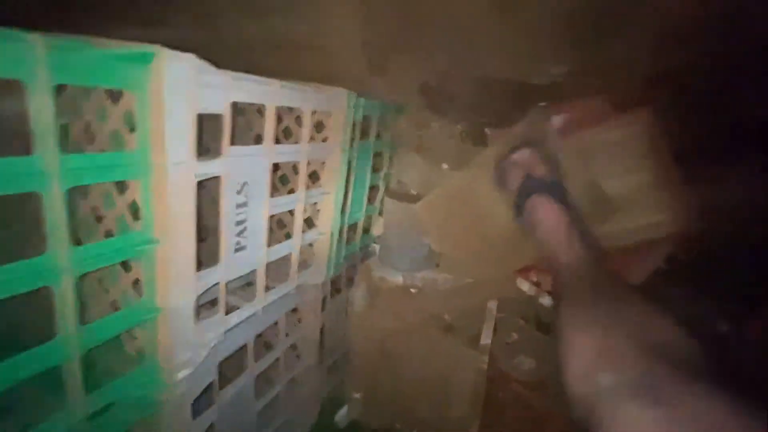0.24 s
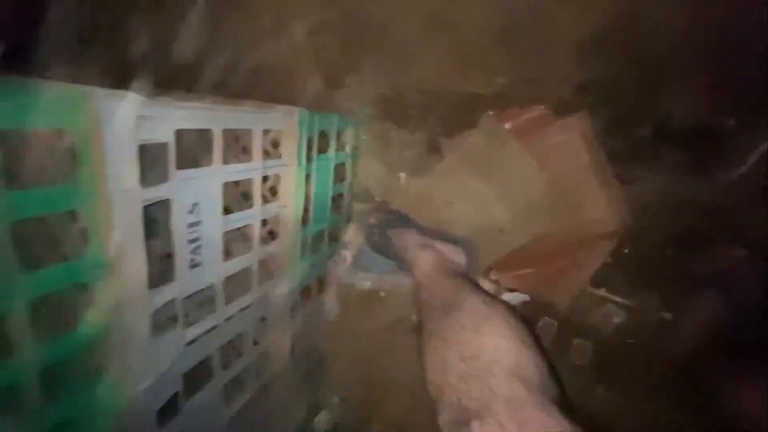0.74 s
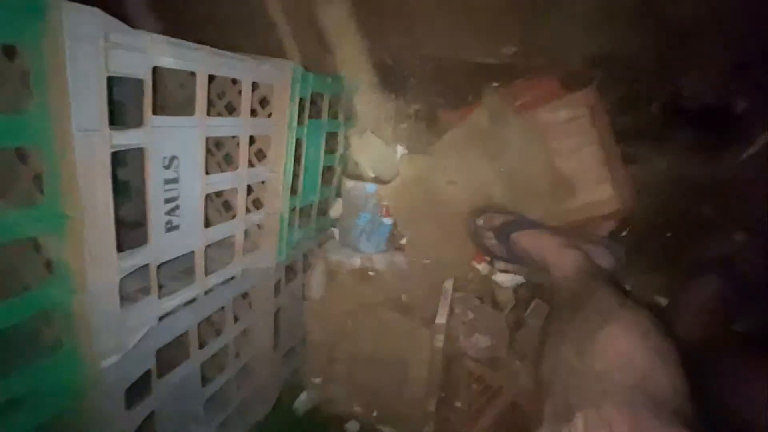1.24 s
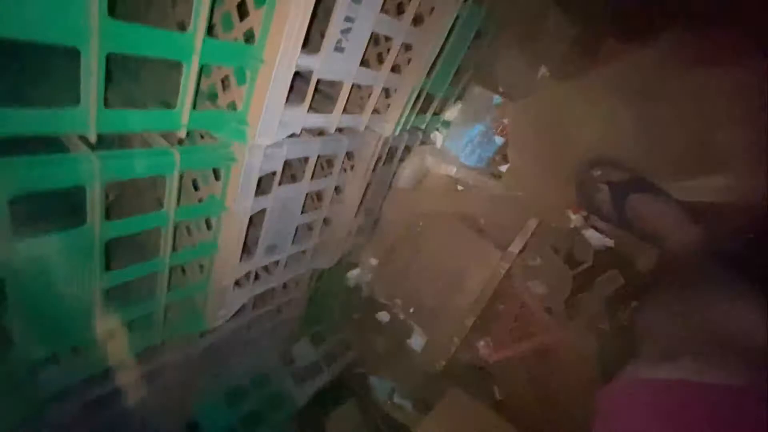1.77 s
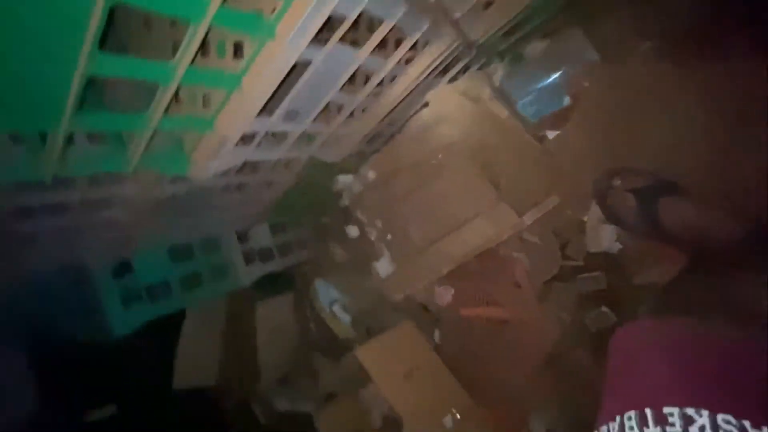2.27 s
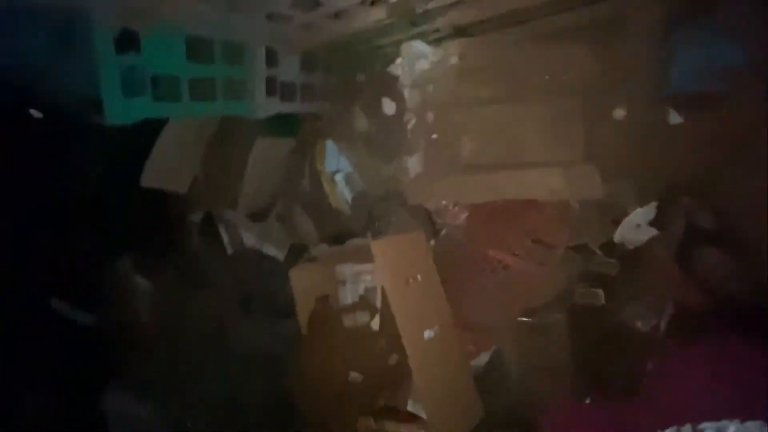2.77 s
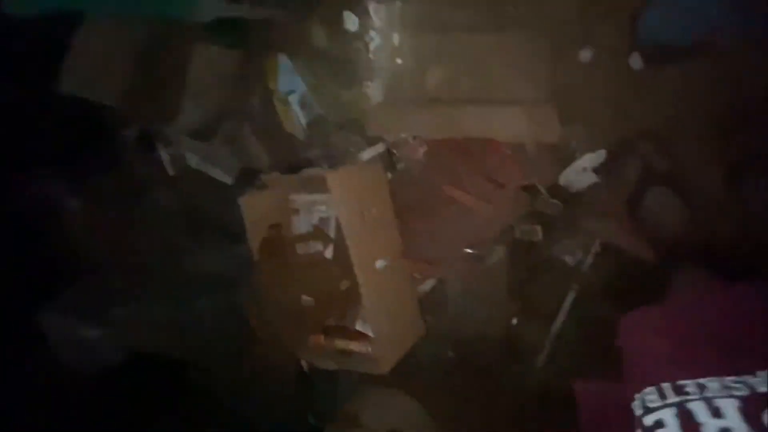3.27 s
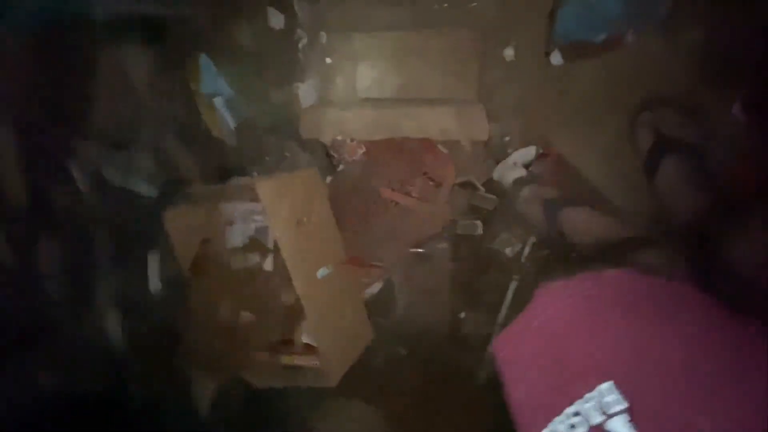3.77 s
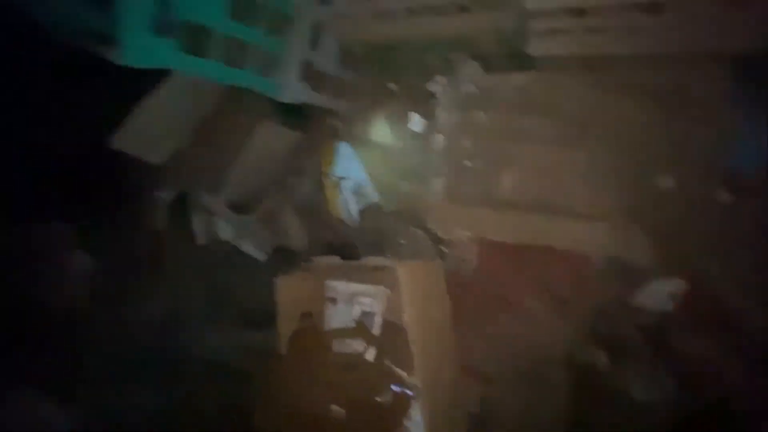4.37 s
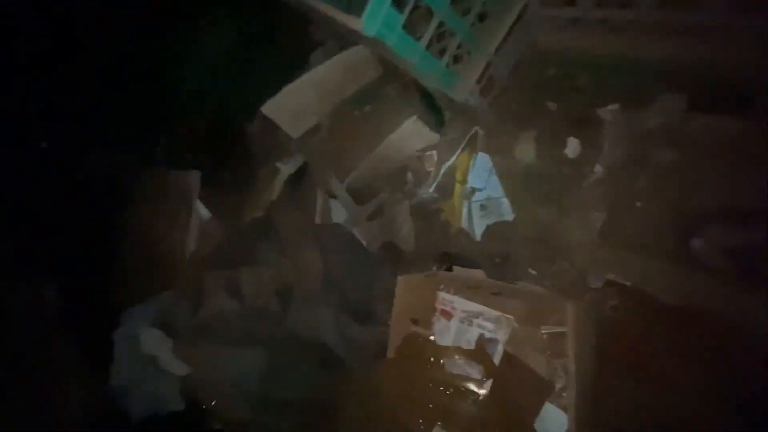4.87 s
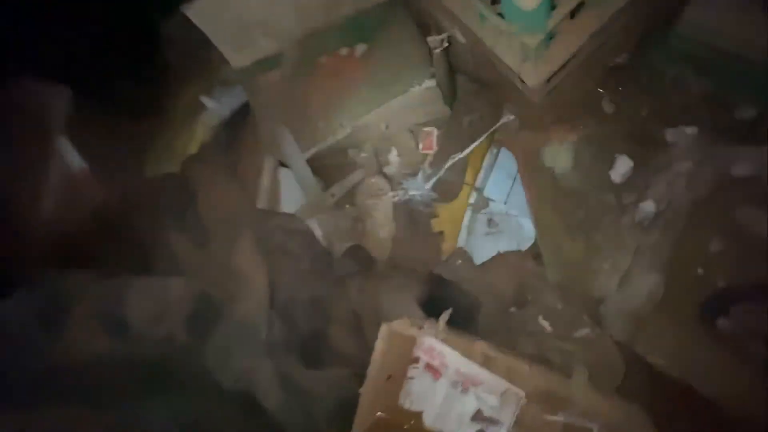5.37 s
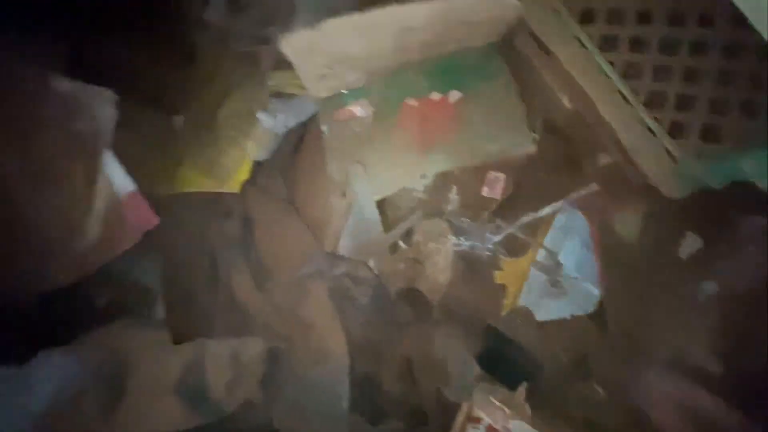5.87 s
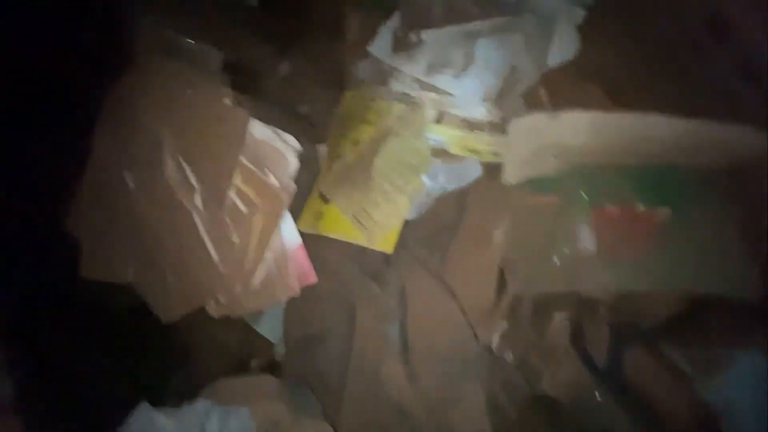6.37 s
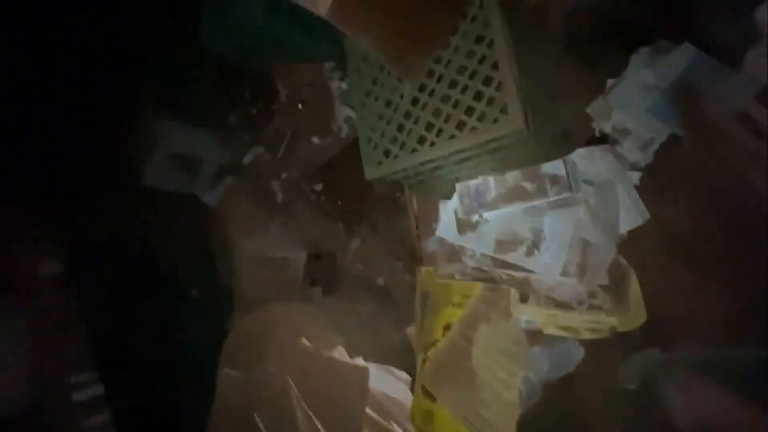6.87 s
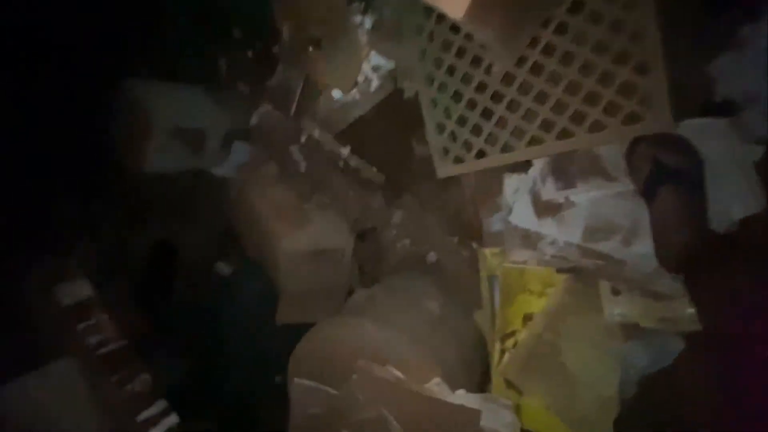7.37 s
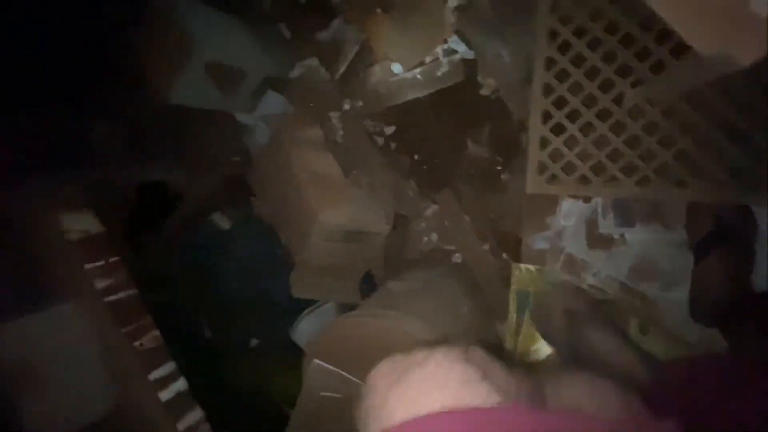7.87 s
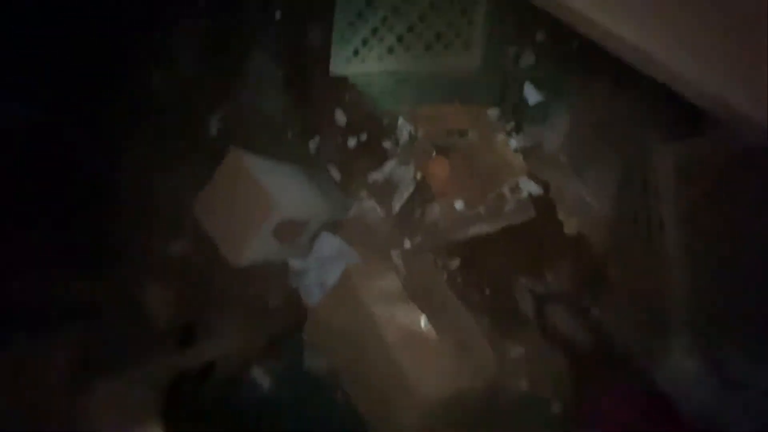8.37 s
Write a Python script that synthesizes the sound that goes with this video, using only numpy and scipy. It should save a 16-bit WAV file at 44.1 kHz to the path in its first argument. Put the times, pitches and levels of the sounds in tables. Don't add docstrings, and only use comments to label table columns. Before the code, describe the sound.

Close phone pickup in a cluttered little shed. Feet scuff grit and knock boxes aside, pause, then shove harder until a sharp hollow slam; rummaging follows, with brittle snaps, papery rasps, dull booming walls and brief squeaky rubs. Separate heavier bumps land near six and seven seconds, then an empty box slides softly and a last knock and scuffle finish it.

```python
import sys
import numpy as np
from scipy import signal
from scipy.fft import rfft, irfft, next_fast_len
from scipy.io import wavfile
from scipy.ndimage import uniform_filter1d, map_coordinates

SR = 44100
rng = np.random.default_rng(int(sys.argv[2]) if len(sys.argv) > 2 else 0)


def volts(x):
    e = np.asarray(x, float) / 20
    return 10 ** e


def digitize_waveform(pressure):
    field = np.atleast_2d(pressure).T
    bounded = np.clip(field, -1, 1)
    quanta = np.round(bounded * 32767).astype(np.int16)
    wavfile.write(sys.argv[1], SR, quanta)


N = 380583

# (frequency [Hz], density [dB per Hz])
GRIT_HISS = [(900, -30.5), (2200, -5.5), (4500, -7), (7000, -8.5), (10000, -11.5), (12500, -18),
             (15000, -14.5), (16300, -24)]
BEND = 1.105


def unit(x):
    return x / np.sqrt(np.mean(x ** 2) + 1e-20)


def along(points, hz):
    f, v = np.transpose(points)
    return np.interp(np.log(hz + 1), np.log(f + 1), v)


def wobble(rate):
    knots = rng.standard_normal(int(N * rate / SR) + 4)
    return map_coordinates(knots, [np.arange(N) * rate / SR])


def filtered(x, response):
    m = next_fast_len(x.shape[-1] + 8192)
    return irfft(rfft(x, m) * response(np.fft.rfftfreq(m, 1 / SR)), m)[..., :x.shape[-1]]


def spread(pair):
    # (frequency [Hz], likeness [0-1])
    port_likeness = [(60, 0.97), (300, 0.92), (700, 0.36), (1400, 0.81), (3000, 0.18), (7000, 0.63),
                     (11000, 0.59), (15000, 0.74)]

    def mix(hz):
        turn = np.arccos(np.clip(along(port_likeness, hz), -1, 1)) / 2
        return np.array([np.cos(turn), np.sin(turn)])

    common, apart = filtered(pair, mix)
    return np.array([common + apart, common - apart])


def rasp(spectrum, pressure):
    return unit(filtered(pressure, lambda hz: volts(along(spectrum, hz))))


def catching(grains_hz, grain_s, spike_db):
    size = np.minimum(rng.exponential(size=N), 2.5)
    catch = (rng.random(N) < grains_hz / SR) * volts(spike_db * size)
    onset = np.minimum(np.arange(400) / 60 + .2, 1)
    kernel = signal.windows.exponential(400, 60, grain_s * SR, False) * onset
    return unit(signal.fftconvolve(catch, kernel)[:N])


def clumped(clump_db):
    z = signal.stft(rng.standard_normal((2, N)), nperseg=256)[2]
    field = uniform_filter1d(rng.standard_normal(z.shape[1:]), size=2, axis=0)
    field = uniform_filter1d(field, size=12, axis=1)
    return signal.istft(z * volts(clump_db * unit(field)), nperseg=256)[1][:, :N]


def swells(peak_s, rise_s, fall_s, peak_db, under_db):
    # (time [s], level [dB])
    settling = [(0, -61), (.28, -68.5), (.45, -65), (.96, -69.5), (1.5, -90), (1.72, -88), (2.36, -71),
                (3.74, -86), (3.86, -66), (4.5, -78), (4.73, -92), (4.8, -96), (5.25, -74), (5.69, -70),
                (6.05, -64.5), (6.81, -64), (7.05, -67.5), (7.7, -71.5), (8, -72.5), (8.63, -72.5)]
    t = np.arange(0, N / SR + .004, .002)
    late = t - np.reshape(peak_s, (-1, 1))
    span = np.where(late < 0, np.reshape(rise_s, (-1, 1)), np.reshape(fall_s, (-1, 1)))
    below_db = 20 * (np.abs(late) / np.maximum(span, .004)) ** BEND
    each = volts(np.reshape(peak_db, (-1, 1)) - below_db)
    rest = volts(np.interp(t, *np.transpose(settling)) + under_db)
    return np.interp(np.arange(N) / SR, t, np.sqrt((each ** 2).sum(axis=0) + rest ** 2))


def shoving():
    # (peak [s], rise [s per 20 dB], fall [s per 20 dB],
    # strength [dB], load on the hollow boxes [dB])
    shoves = [(0.159, 0.08, 0.06, -52, -7), (.47, -0.09, 0.14, -51, -2), (0.555, .04, 0.1269, -39.5, 6),
              (0.588, 0.01, 0.0958, -42.5, 18.5), (.71, -0.0248, 0.08, -49, 7.5),
              (0.798, 0.02, 0.0474, -45.5, 5.5), (1.0, 0.03, 0.2, -49, 4), (1.08, -0.06, 0, -53, 11.5),
              (1.78, 0.04, 0.17, -52, -3.5), (1.878, 0.1341, 0.75, -58, 1), (2.11, 0.2631, 0.35, -54, 5.5),
              (2.466, 0.0245, 0.28, -38, -4), (2.568, 0.0951, 0.11, -42.5, 5.5),
              (2.748, 0.06, 0.08, -49, -3.5), (2.955, 0.09, 0.0436, -41, 0.5),
              (3.125, 0.0053, 0.0148, -36, -3.5), (3.18, 0.27, 0.1, -47.5, 11),
              (3.371, 0.92, -0.2, -60.5, 4.5), (3.46, 0.36, 0.17, -56.5, 5), (3.59, 0.64, -0.05, -56, 6.5),
              (3.811, 0.04, .02, -64, 10.5), (3.96, .05, 0.17, -46.5, -4.5), (4.05, 0, 0.19, -48, 1),
            (4.141, 0.25, -0.03, -47.5, -10), (4.269, 0.1, 0.24, -52.5, 3.5), (4.37, 0.13, 0.24, -53, 7.5),
            (4.459, 0.16, -0.0037, -45.5, -3), (4.508, 0.12, 0.11, -46.5, 9.5),
            (4.815, .02, 0.2, -51.5, -24), (4.93, 0.05, 0.19, -47.5, -16.5), (5.04, 0.18, 0.18, -60, 10),
            (5.39, 0.07, 0.11, -56, 6.5), (5.446, 0.07, .14, -48.5, -3), (6.119, 0.0576, 0.2664, -39, 4),
            (6.501, 0.25, 0.06, -53, -6), (6.66, 0.7, 0.55, -60.5, 8.5), (7.13, 0.055, 0.2, -40, 3),
            (7.21, -0.02, 0.17, -50, 6.5), (7.375, 0.18, 0.12, -52, 8), (7.56, .2, 0.12, -64, 8),
            (8.142, 0.04, 0.7, -59, 5), (8.4, 0.09, 0.14, -56.5, 5), (8.448, 0.06, 0.14, -56, 7)]
    # (peak [s], rise, fall [s per 20 dB], strength, load [dB])
    scuffs = [(0.63, 0.01, 0.0463, -46.5, 12), (3.03, 0.0751, 0.06, -46.5, 0.5), (3.14, 0.05, .09, -39, -5),
              (3.09, .04, .02, -42, 0), (3.3, 0.05, 0.01, -50.5, -0.5), (2.42, 0.03, 0.15, -49, 0.5),
              (1.03, 0.01, 0.0651, -51, 4.5), (.88, .08, 0.08, -65, -4.5), (4.435, 0.05, 0.03, -50, -3),
              (4.57, 0, 0.12, -56.5, 14), (3.22, 0.17, -0.12, -54.5, -1), (3.64, 0.93, 0.08, -66.5, 1),
              (3.934, .02, .012, -39, -12), (4.2, 0.02, -0.05, -53, -5), (5.795, .02, 0.01, -64, -28),
              (.8, .025, 0.0242, -42, -20), (4.52, 0.4, 0.33, -66, 16), (5.305, -0.12, 0.26, -62, -12),
              (5.46, -0.02, 0.01, -47, -5), (6.089, 0.01, 0.002, -34, 3),
              (6.127, 0.0063, -0.0042, -37.5, 1), (6.16, 0.0075, -0.0038, -35, -1),
              (6.251, 0.0429, 0.0047, -44, 5.5), (6.395, 0.04, -0.05, -50, -8),
              (6.67, 0.05, -0.01, -47.5, -4.5), (8.3, .05, .1, -57.5, 0), (8.36, .04, 0.1, -56, 12.5)]
    # (peak [s], fall [s per 20 dB], strength [dB])
    treads = [(.18, 0.13, -49), (.59, 0.15, -47), (.83, 0.1, -53), (1.04, 0.08, -46), (2.2, 0, -49.5),
              (2.57, .5, -58), (2.94, .04, -42), (3.14, 0.06, -34.5), (3.3, 0.4, -45.5), (3.6, 0.06, -50),
              (4.03, 0.44, -57.5), (4.53, 0.2, -49), (5.05, 0.12, -47.5), (5.4, 0.38, -54),
              (6.18, 0.32, -43.5), (6.53, 0.14, -38), (6.749, 0.5, -67), (7.128, 0.31, -39.5),
              (7.38, -0.4, -32.5), (7.72, 0.2, -60), (8.16, 0.1, -51), (8.48, 0.37, -47)]
    # (time [s], level [dB])
    drag = [
        (7.4, -96),
        (7.62, -60),
        (7.8, -64),
        (8.02, -56),
        (8.11, -58),
        (8.2, -103),
    ]
    # (frequency [Hz], density [dB per Hz])
    card_rasp = [(250, -18), (550, -1.5), (1000, -5), (1600, -8.5), (2300, -8.5), (4500, -25.5)]
    hollow_hum = [(110, -34), (190, 2), (320, 5), (480, 3.5), (800, -54.5)]
    ground_thud = [(20, -14), (40, -2), (70, 7), (100, 1.5), (160, -1.5), (260, -50.5)]
    box_hum = [(180, -14), (310, 4), (400, 2.5), (500, -1.5), (900, -30)]

    t = np.arange(N) / SR
    s, rise, fall, db, load = np.transpose(shoves + scuffs)
    land, ease, weight_db = np.transpose(treads)
    low = rng.standard_normal((2, N))
    judder = wobble(40)
    grains = catching(grains_hz=150, grain_s=.003, spike_db=2.5)

    press = volts(1.9 * judder) * (1 + 0.1 * grains) * clumped(clump_db=3.0)
    grit = volts(2.5) * swells(s, rise, fall, db, 0) * rasp(GRIT_HISS, press)

    press = volts(2.6 * judder + 1.4 * wobble(58)) * (1 + .5 * grains) * clumped(clump_db=4.0)
    card_db = db + 1.2 + 0.15 * load
    card = volts(2.5) * swells(s, rise, 0.86 * fall, card_db, -12) * rasp(card_rasp, press)

    press = volts(.9 * judder + 2 * wobble(25)) * low
    hollow = volts(-4) * swells(s, rise, 0.94 * fall, db + load, -7.5) * rasp(hollow_hum, press)

    weight = volts(-2.0) * swells(land, 0.41 * ease, ease, weight_db, -31.5)
    ground = (weight + volts(-79)) * rasp(ground_thud, low)

    box = volts(np.interp(t, *np.transpose(drag))) * rasp(box_hum, low[::-1, ::-1])
    return spread(grit + card + hollow + ground + box)


def knocks():
    # (time [s], peak [dB], ring [Hz])
    cracks = [(.53, -42, 2320), (.783, -51.5, 1200), (2.659, -44.5, 2250), (3.931, -45.5, 2435),
              (6.516, -41.5, 2500), (6.651, -41, 746), (7.492, -56, 1500)]
    snaps = [(.7, -38, 732), (1.39, -50.5, 3750), (1.997, -38.5, 1400), (3.401, -43.5, 1050),
             (4.077, -38.5, 1100), (4.127, -32.5, 2800), (4.17, -43, 2360), (4.514, -35, 5200),
             (5.792, -47, 2700), (6.186, -21, 4200), (6.26, -36, 3930), (7.19, -34.5, 750)]
    # (time [s], peak [dB], ring [Hz])
    ticks = [(0.635, -30.5, 1300), (0.708, -35, 2550), (1.852, -38, 2980), (2.604, -30, 1190),
             (3.128, -16.5, 1314), (3.468, -37.5, 2330), (3.617, -49, 2270), (4.14, -40, 2420),
             (4.189, -42, 805), (4.547, -37, 802), (4.611, -52, 845), (4.671, -55.5, 2100),
             (4.983, -36, 1880), (5.041, -38.5, 2230), (5.074, -39, 810), (5.174, -62, 810),
             (5.426, -34, 2310), (5.499, -44, 2040), (6.209, -28.5, 1030), (6.246, -31, 500),
             (6.307, -36.5, 1780), (6.329, -41, 1290), (6.352, -37.5, 2800), (6.399, -44, 3500),
             (6.563, -42, 2080), (6.619, -45, 2760), (8.192, -42.5, 1580), (8.277, -39, 820),
             (8.309, -44, 2400), (8.341, -45.5, 1500), (8.393, -37.5, 3110), (8.428, -38, 2200)]
    # (time [s], peak [dB], ring [Hz], t60 [s])
    clacks = [(2.101, -31, 1620, 0.015), (2.466, -28.5, 1910, 0.075), (3.799, -35, 1100, 0.025),
              (6.158, -28, 2680, 0.04), (.552, -29.5, 2270, 0.067), (.581, -24.5, 525, 0.02),
              (.604, -25.5, 1295, 0.077), (0.983, -45.5, 1050, 0.072), (1.076, -28, 1590, 0.014),
              (2.052, -37, 577, 0.06), (2.396, -39.5, 2080, 0.03), (2.74, -32, 910, 0.0078),
              (3.075, -22.5, 870, 0.019), (3.218, -30, 1997, 0.028), (3.356, -28, 3850, 0.015),
              (3.436, -36.5, 2610, 0.0053), (3.857, -44, 2170, 0.02), (3.987, -18, 2030, 0.031),
              (4.284, -28, 985, 0.0079), (5.725, -47.5, 1760, .012), (6.091, -21, 576, 0.04),
              (6.481, -34, 2440, 0.017), (7.293, -37.5, 760, 0.066), (8.138, -34, 666, 0.034)]
    raps = [(.462, -30, 975, 0.12), (2.563, -24, 976, 0.051), (3.044, -32.5, 695, 0.03),
            (3.585, -37, 1632, 0.016), (7.804, -52.5, 910, .02), (7.86, -55, 3140, 0.014),
            (4.04, -21, 1096, 0.016), (4.267, -22.5, 1226, 0.01), (3.964, -34, 648, 0.017),
            (5.304, -39.5, 1270, 0.048), (7.094, -26, 1400, 0.02), (7.115, -29, 696, 0.035),
            (7.386, -27, 2740, 0.0066), (7.611, -43, 632, 0.033), (8.454, -27, 530, 0.025)]
    dull_knocks = [(0.058, -27.5, 1400, 0.027), (2.922, -31.5, 714, 0.064), (3.452, -30, 2268, 0.0063),
                   (3.758, -46.5, 756, 0.021), (3.771, -45.5, 900, 0.017), (4.344, -24, 740, 0.011),
                   (4.366, -24, 780, 0.037), (4.375, -23.5, 664, 0.023), (4.811, -24, 3200, 0.015),
                   (5.01, -29, 507, 0.025), (5.47, -20, 2156, .024), (6.123, -22.5, 760, 0.022),
                   (8.046, -44, 2000, 0.015)]
    # (time [s], peak [dB], ring [Hz], t60 [s])
    rings = [(.463, -30.5, 1830, 0.071), (.464, -33.5, 2310, .04), (3.111, -5.5, 624, 0.044),
             (3.1105, -4, 1003, 0.022), (3.124, 0, 2420, 0.018), (3.124, -6.5, 1300, 0.021),
             (3.123, -8, 3250, 0.029), (4.041, -20.5, 2590, 0.024), (4.042, -20, 511, 0.03),
             (4.497, -16, 1490, 0.025), (4.499, -13.5, 860, 0.04), (4.501, -12.5, 500, .045),
             (4.811, -24, 1057, 0.02), (3.099, -30, 2400, .02), (5.291, -42, 4220, 0.045),
             (5.311, -32.5, 608, 0.067), (5.325, -25, 734, 0.06), (5.338, -31.5, 700, 0.069),
             (5.321, -35, 2420, 0.058), (5.37, -39.5, 599, .06), (8.141, -32.5, 1161, 0.018)]
    # (snap over ring [dB], rise [ms])
    kinds = [
        (10, 0.52),
        (2, 1.7),
        (-7, 0.9),
        (-5, 1.3),
        (-16.5, 1.9),
        (-29.5, 1.3),
        (-89.5, 0.59),
    ]

    brittle_t60 = .026
    groups = [[(*row, brittle_t60) for row in rows] for rows in (cracks, snaps, ticks)]
    groups += [clacks, raps, dull_knocks, rings]
    contacts = sorted((*row, *kind) for rows, kind in zip(groups, kinds) for row in rows)

    ring, snap = np.zeros((2, N + SR)), np.zeros((2, N + SR))
    t = np.arange(4096) / SR
    f = np.fft.rfftfreq(len(t), 1 / SR)
    for s, db, hz, t60, snap_db, rise_ms in contacts:
        onset = 1 - np.exp(-(t / (max(rise_ms, .2) / 1000)) ** 2)
        shape = volts(-60 * t / np.clip(t60, .004, .06)) * onset
        shape = shape / shape.max()
        wander = .05 * np.sqrt(hz / 1000) * np.cumsum(rng.standard_normal(len(t)))
        mode = np.sin(2 * np.pi * hz * t + wander + rng.normal(0, 0.075, (2, 1)))
        band = 1 / (1 + (np.log((f + 1) / np.sqrt(1300 * hz)) / 0.85) ** 4)
        chatter = rng.standard_normal(len(t)) + 0.81 * rng.standard_normal((2, len(t)))
        lumps = volts(5 * unit(uniform_filter1d(rng.standard_normal(len(f)), size=24)))
        clatter = unit(irfft(rfft(chatter) * band * lumps, len(t)))
        loose = 0.69 * volts(0.13 * min(snap_db, 0))
        side = volts(rng.normal(0, 0.34) * np.array([[1], [-1]]))
        at = slice(round(s * SR), round(s * SR) + len(t))
        ring[:, at] += side * volts(db - 5) * (0.76 * mode + loose * clatter) * shape
        snap[:, at] += volts(db + snap_db + 9.5) * shape * rng.standard_normal((2, len(t)))
    hiss = filtered(snap[:, :N], lambda hz: volts(along(GRIT_HISS, hz)))
    return ring[:, :N] + spread(hiss)


def thumps():
    # (time [s], peak [dB], wall pitch [Hz])
    blows = [(.15, -48, 229.4), (0.176, -40, 147.4), (.469, -23.5, 300), (0.51, -30, 307), (.555, -24, 406),
             (.586, -22, 290), (.594, -22, 333), (0.607, -28.5, 296), (0.719, -34.5, 317),
             (0.812, -34, 288), (1.012, -39, 440), (1.086, -45, 100.7), (1.84, -44, 400), (2.145, -43, 171),
             (2.215, -47, 330), (2.91, -36, 351), (3.112, -16, 493.6), (3.115, -21.5, 190.3),
             (3.117, -15, 403), (3.122, -15.5, 91.8), (3.163, -28, 95), (3.22, -28, 105),
             (3.27, -31, 100.2), (3.33, -35, 110.1), (3.42, -39, 100), (3.59, -41.5, 150.6),
             (4.503, -24.5, 331), (5.012, -31, 200), (6.084, -33, 333), (6.512, -38.5, 108),
             (6.53, -34.5, 70), (6.577, -31.5, 68.3), (7.112, -27, 88), (7.191, -23.5, 192),
             (8.144, -32, 189.6), (8.458, -28.5, 190.3), (8.47, -30.5, 115)]
    sag_s = .008
    out, t = np.zeros(N + SR), np.arange(SR // 2) / SR
    for s, db, hz in blows:
        t60 = 0.12 * (hz / 200) ** -0.45
        decay = volts(-60 * t / max(t60, .01))
        drift = .8 * min(hz / 250, 1) * np.cumsum(rng.standard_normal(len(t))) / np.sqrt(SR / 40)
        sharp = 1.13 * min(hz / 200, 1) ** 2 / (1 + (hz / 215) ** 6)
        sag = sharp * sag_s * (1 - np.exp(-t / sag_s))
        boom = np.sin(2 * np.pi * hz * (t + sag) + drift)
        boom = boom + 0.58 * np.sin(2 * np.pi * 1.1 * hz * t) * decay
        onset = 1 - np.exp(-t / 0.001)
        out[round(s * SR):][:len(t)] += volts(db - 2.5) * boom * decay * onset
    return out[:N]


def shed(x):
    # (frequency [Hz], t60 [s])
    shed_t60 = [(100, 0.42), (500, 0.4), (2500, 0.21), (10000, 0.13)]
    out, step = np.zeros((2, N + SR)), SR // 3
    for start in range(0, N, step):
        hz, t, z = signal.stft(rng.standard_normal((2, step)), SR, nperseg=256)
        decay = volts(-60 * t / along(shed_t60, hz)[:, None])
        tail = signal.istft(z * decay, SR, nperseg=256)[1]
        wet = signal.fftconvolve(x[None, start:start + step], tail / np.linalg.norm(tail[0]), axes=1)
        out[:, start + 200:start + 200 + wet.shape[1]] += wet
    return spread(out[:, :N])


def rubs():
    # (peak [s], build-up [s per 20 dB], peak [dB], pitch [Hz])
    singing = [(1.02, .015, -40, 750), (1.05, .015, -41, 480), (1.088, .01, -42, 520),
               (1.15, .04, -51, 100), (.555, .01, -33, 1200), (1.762, .008, -49, 1450),
               (4.501, .005, -23, 1080), (1.855, .02, -49, 400), (1.935, .012, -48, 3030),
               (2.062, .015, -42, 520), (2.065, .012, -46, 3000), (2.115, .01, -44, 2880),
               (2.113, .012, -44, 590), (2.165, .015, -45, 130), (2.2, .015, -45, 105),
               (2.183, .015, -45, 420), (2.217, .01, -48, 1560), (2.565, .01, -36, 500),
               (2.53, .03, -40, 300), (2.965, .015, -41, 590), (2.91, .015, -43, 210),
               (3.137, .012, -19, 195), (3.18, .03, -28, 95), (3.356, .003, -38, 1130),
               (3.452, .004, -40, 950), (3.453, .005, -38, 380), (3.53, .005, -46, 800),
               (3.988, .005, -30, 1200), (4.345, .004, -35, 1900), (4.345, .004, -35, 1300),
               (4.499, .002, -26, 2130), (4.813, .002, -29, 3800), (4.813, .002, -33, 2200),
               (4.9, .04, -42, 1950), (4.95, .05, -42, 2500), (4.91, .02, -45, 3900), (4.94, .03, -46, 950),
               (5.018, .008, -33, 250), (6.09, .008, -30, 1270), (6.18, .012, -31, 170),
               (6.66, .006, -47, 430), (6.8, .07, -52, 55), (7.135, .015, -29, 190),
               (7.145, .012, -40, 1950), (7.37, .005, -43, 1650), (7.452, .004, -50, 800),
               (7.62, .01, -48, 300), (8.457, .003, -40, 1900)]
    s, rise, db, hz = np.transpose(singing)[:, :, None]
    late = np.arange(-(SR // 10), SR // 6) / SR
    span = np.clip(rise, .001, .2) * np.where(late < 0, 1, 1.5)
    steps = rng.standard_normal((len(singing), len(late)))
    wander = .055 * hz / 100 * np.sqrt(np.abs(rise)) * np.cumsum(steps, axis=1)
    swell = volts(db - 20 * (np.abs(late) / span) ** BEND)
    tones = swell * np.sin(2 * np.pi * hz * late + wander)
    at = np.round(s * SR).astype(int) + np.arange(len(late))
    return np.bincount(at.ravel(), tones.ravel(), N + SR)[SR // 10:][:N]


def scene():
    slides = shoving()
    hits = knocks() + thumps()
    echo = volts(-14.5) * shed(hits.mean(axis=0))
    return slides + hits + echo + rubs()


def patchy_treble(x):
    mid, side = (x[0] + x[1]) / 2, (x[0] - x[1]) / 2
    hz, _, z = signal.stft(mid, SR, nperseg=1024)
    luck = rng.standard_normal((32, z.shape[1])) + rng.standard_normal(z.shape[1])
    luck = uniform_filter1d(luck, size=4, axis=1)
    power = np.abs(z) ** 2 + 1e-14
    bright = np.log(power[hz > 7000].sum(axis=0) / power.sum(axis=0))
    luck = luck + .5 * unit(bright - bright.mean())
    empty = np.interp(hz, [8000, 11800, 12300, 16000], [-3, -1, .3, .5])
    kept = luck[(hz // 700).astype(int)] > empty[:, None]
    mid = signal.istft(z * kept, SR, nperseg=1024)[1][:N]
    return np.array([mid + side, mid - side])


def band_limit(x):
    return signal.sosfilt(signal.butter(12, 16510, fs=SR, output="sos"), x)


def record(dry):
    # (frequency [Hz], level difference [dB])
    port_lean = [(60, -0.5), (180, -1.0), (550, -3.0), (1650, -1.5), (4970, -0.5), (15000, 0.0)]
    # (frequency [Hz], phase lead [radians])
    port_lead = [(0, 0), (1980, 0.15), (2760, 1.3), (3790, 0.8), (4820, 3.4), (5510, 6.9), (8180, 7.9),
                 (16100, 9.7)]
    dips = [.7685, 2.092, 3.3445, 3.788, 3.973, 5.366, 6.641, 7.479]

    def ports(hz):
        half = volts(along(port_lean, hz) / 2) * np.exp(.5j * along(port_lead, hz))
        bass_cut = (1j * hz / (1j * hz + 40)) ** 2
        return bass_cut * (hz < 16300) * np.array([half, 1 / half])

    x = filtered(dry, ports)
    t, gate = np.arange(N) / SR, np.ones(N)
    for s in dips:
        gate *= np.clip((np.abs(t - s) - .0024) / .002, volts(-25), 1)
    mix = patchy_treble(x * gate)
    return band_limit(mix)


dry = scene()
out = record(dry)
digitize_waveform(out)
```